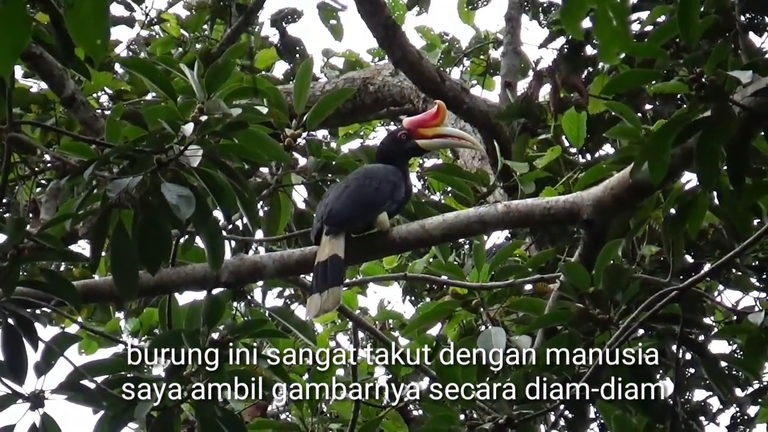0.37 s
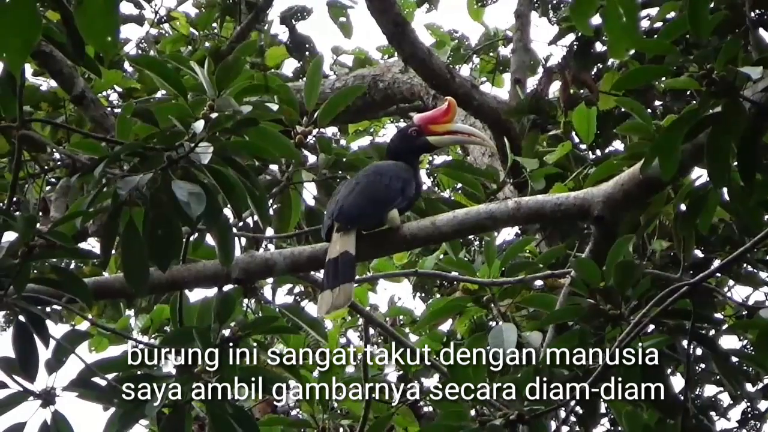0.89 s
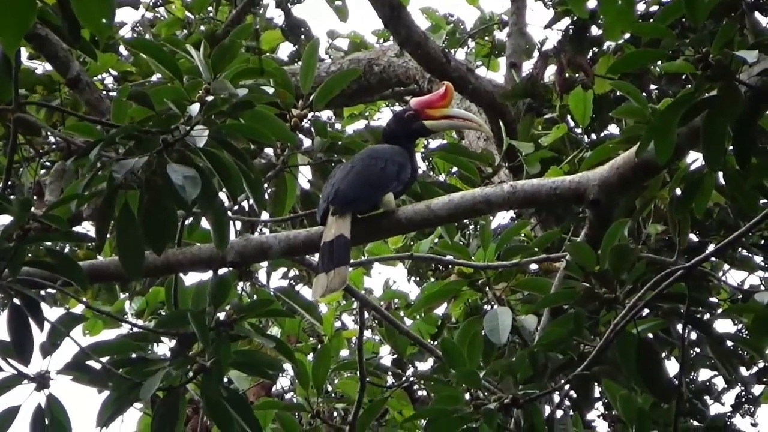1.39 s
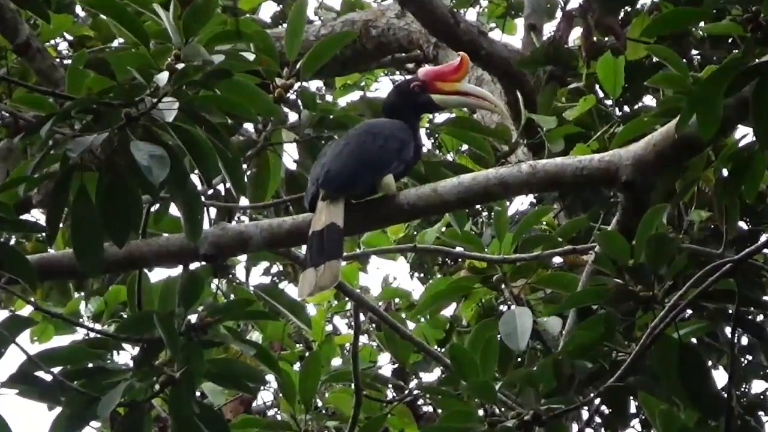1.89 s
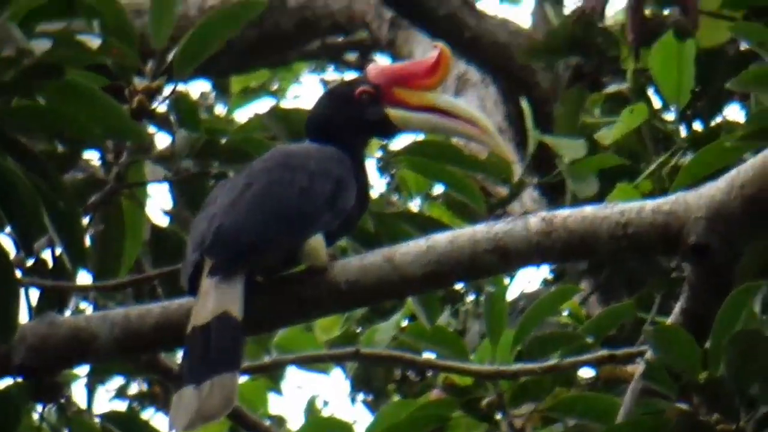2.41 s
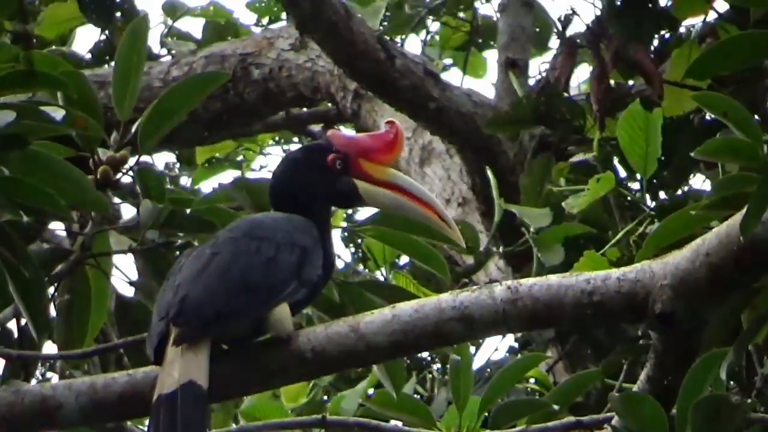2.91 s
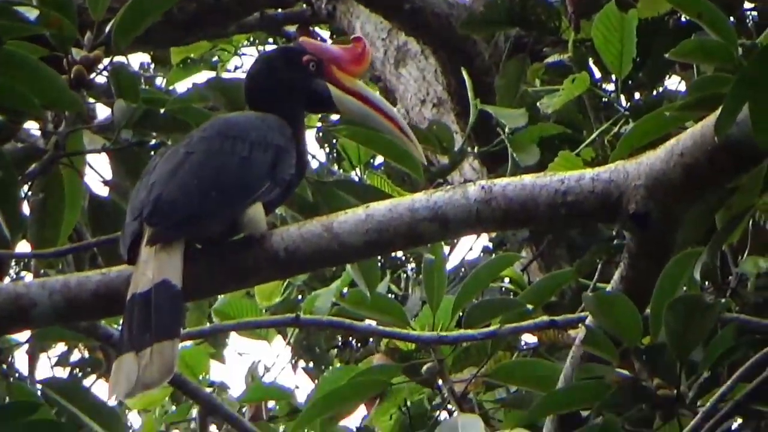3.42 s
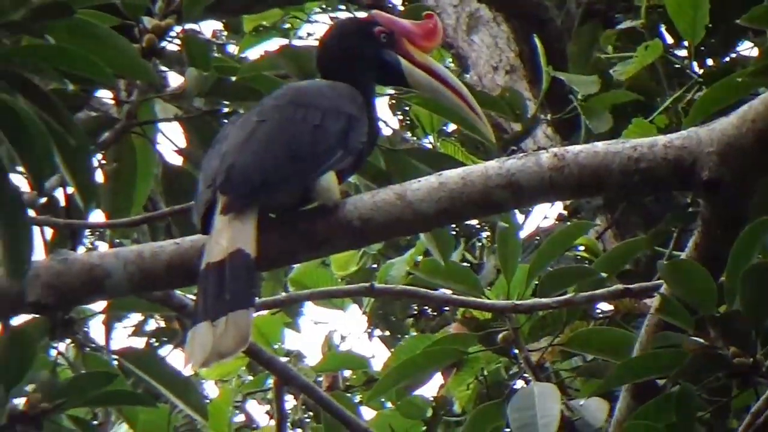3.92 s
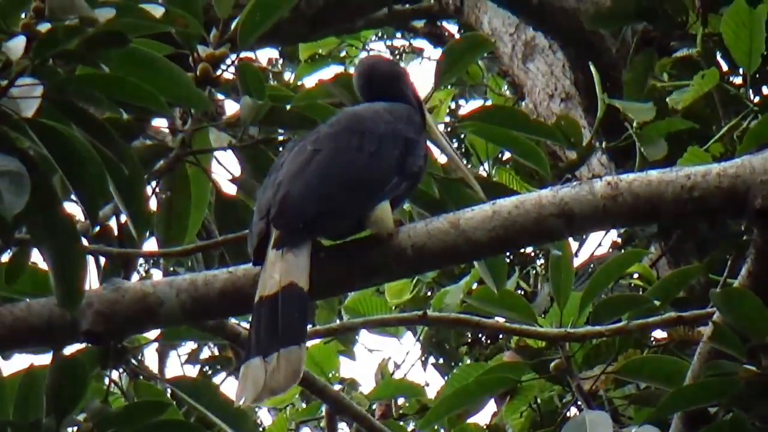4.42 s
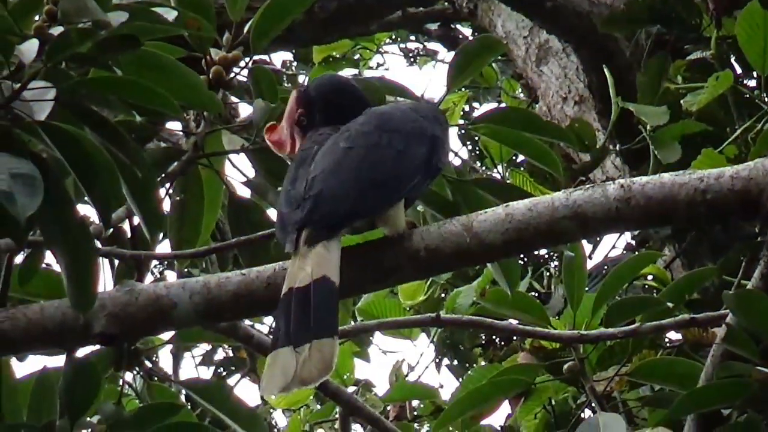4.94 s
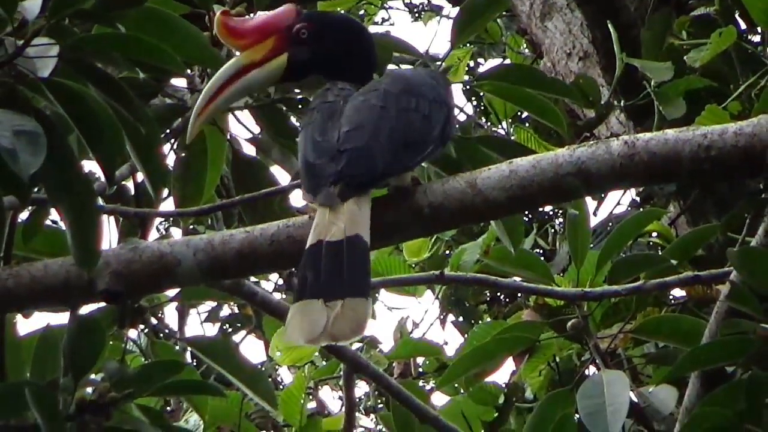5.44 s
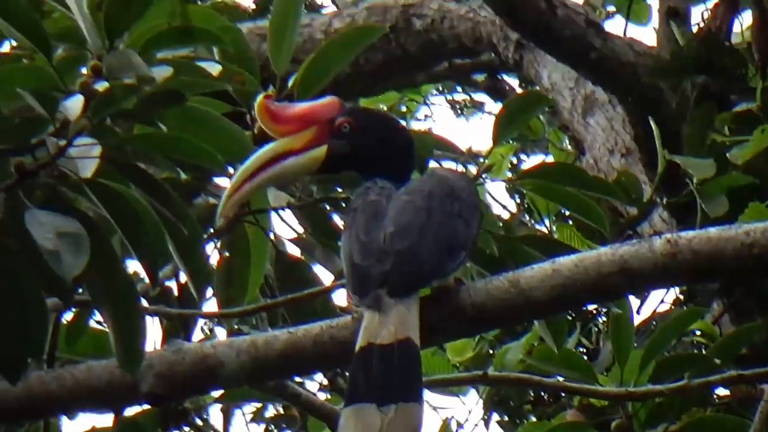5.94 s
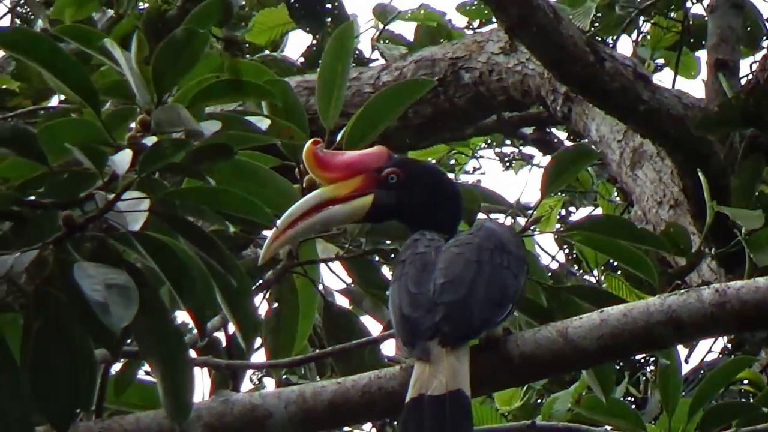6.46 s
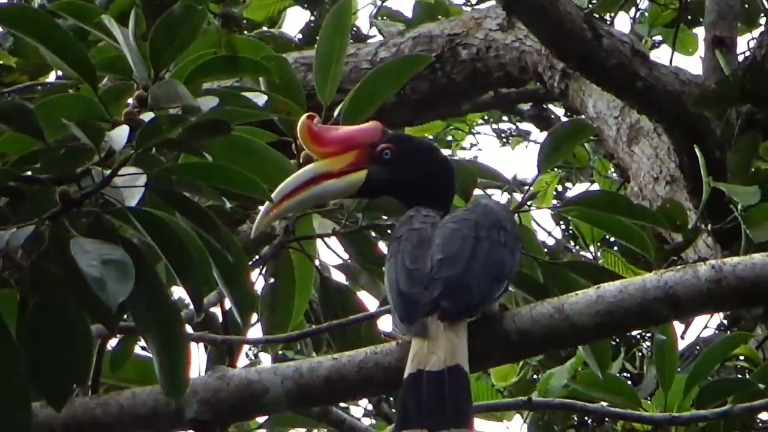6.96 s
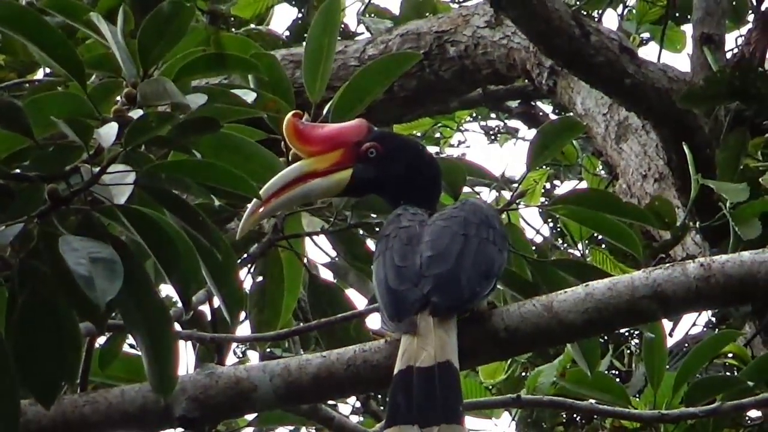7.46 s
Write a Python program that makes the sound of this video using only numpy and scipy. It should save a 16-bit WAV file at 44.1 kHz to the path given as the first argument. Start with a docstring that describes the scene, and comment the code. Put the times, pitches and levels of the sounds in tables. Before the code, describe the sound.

A shrill, steady cricket drone fills a tropical forest while buzzing cicadas swell and cut off, with faint croaks, bird notes and twig knocks.

```python
"""Insect chorus in a tropical forest: crickets, warbling sines with a weak octave, blur into one shrill drone.
Cicadas are buzzes of falling rings that swell and cut off, one far voice sounding throughout; scrapers are
resonant hiss. A far croaking of filtered noise breathes in and out over low hum lines and coloured hush.
Faint bird and frog notes are near sines, twig knocks are struck modes; at the end a squeak of high harmonics
rises in a rustle. Most voices ring among the trunks in decaying noise echoes."""
import sys
import numpy as np
from scipy import signal
from scipy.fft import rfft, irfft
from scipy.io import wavfile
from scipy.ndimage import map_coordinates

SR = 44100
rng = np.random.default_rng(int(sys.argv[2]) if len(sys.argv) > 2 else 0)


def wav_out(sig):
    """Save sig, one row per channel (or a flat mono array), as 16-bit PCM at SR to the path in sys.argv[1]."""
    wavfile.write(sys.argv[1], SR, np.round(np.clip(np.atleast_2d(sig).T, -1, 1) * 32767).astype(np.int16))


def undo_db(level):
    """Turn decibels back into plain size, where 20 dB means ten times bigger."""
    steps = np.asarray(level, float) / 20
    return 10 ** steps


N = 334719


def rms_one(x):
    """Scales to an rms of 1."""
    return x / np.sqrt(np.mean(x ** 2) + 1e-20)


def in_time(rows):
    """Columns interpolated over time, then a gate that is open while the table lasts."""
    time_s, *columns = np.transpose(rows)
    t = np.arange(N) / SR
    return [np.interp(t, time_s, column) for column in columns] + [(t >= time_s[0]) & (t <= time_s[-1])]


def drift(rate_hz):
    """Smooth random wander of spread about 1, two random points per cycle of the rate."""
    count = int(N / SR * rate_hz * 2) + 3
    return map_coordinates(rng.standard_normal(count), [np.linspace(0, count - 1, N)], order=3)


def turning(hz):
    """Phase in radians of a varying frequency."""
    return 2 * np.pi * np.cumsum(hz) / SR


def panned(x, pan_db):
    """Level difference between the sides; positive is left."""
    return x * undo_db(np.array([[.5], [-.5]]) * pan_db)


def band(x, hz, width_hz):
    """Band-pass with a flat top and steep flanks."""
    edges_hz = [hz - width_hz / 2, hz + width_hz / 2]
    return signal.sosfilt(signal.butter(3, edges_hz, "band", fs=SR, output="sos"), x)


def resonance(x, hz, width_hz):
    """Two-pole peak of gain 1, passed twice for steep flanks."""
    r = np.exp(-np.pi * width_hz / SR)
    for _ in range(2):
        x = signal.lfilter([(1 - r * r) / 2, 0, (r * r - 1) / 2],
                           [1, -2 * r * np.cos(2 * np.pi * hz / SR), r * r], x)
    return x


def spread(mid, side, alike):
    """Left and right of a given likeness from two independent noises."""
    return (np.sqrt(1 + alike) * mid + np.sqrt(1 - alike) * side * [[1], [-1]]) / np.sqrt(2)


def pair_of_noise(alike, size=N):
    """Stereo white noise of a given likeness (0-1)."""
    mid, side = rng.standard_normal((2, size))
    return spread(mid, side, alike)


def forest(x, wet_db):
    """Direct sound plus dense scatter off trunks and leaves; moving air keeps changing the paths."""
    t60_s, air_shift_s, echo_likeness = .55, .25, 0.44
    size, step = int(t60_s * SR), int(air_shift_s * SR)
    padded = np.pad(x, [(0, 0), (step, 2 * step)])
    echoes = np.zeros((2, padded.shape[1] + size))
    fade = np.sin(np.pi * np.arange(2 * step) / (2 * step))   # overlapping halves add up in power
    for start in range(0, N + step, step):
        tail = pair_of_noise(echo_likeness, size) * undo_db(-60 * np.arange(size) / size)
        tail = tail / np.sqrt(np.sum(tail ** 2) / 2)
        part = signal.fftconvolve(padded[:, start:start + 2 * step] * fade, tail, axes=1)
        echoes[:, start:start + part.shape[1]] += part
    return (x + undo_db(wet_db) * echoes[:, step:step + N]) / np.sqrt(1 + undo_db(2 * wet_db))   # power is kept


# crickets: (warbles_per_s, swing_hz, pan_db, octave_db), (start_s, first_hz, settled_s, last_hz, level_db)
CRICKET_VOICES = [((20.5, 32, 0.1, -46), (0, 5835, 7.6, 5828, -43.5)), ((10.3, 95, 0.1, -40),
                  (0, 5755, 7.6, 5770, -43.2)), ((19.3, 48, 0.5, -29), (0, 5690, 7.6, 5735, -43.7)),
                  ((11.2, 40, -0.5, -45), (0, 5975, 2, 6020, -54)), ((18.7, 40, 0.5, -45),
                  (0, 6000, 3, 5950, -57)), ((19.9, 38, 0.1, -45), (1.6, 5570, 3.8, 5660, -49.5)),
                  ((9.8, 45, 0.5, -45), (3.9, 5410, 5.3, 5570, -50.5)), ((8.5, 25, 1.0, -45),
                  (0, 5465, 4.5, 5460, -64)), ((9.8, 42, 0.5, -45), (2.3, 5420, 7.6, 5440, -57))]


def crickets():
    """Each wing note warbles up and down, louder on one stroke; a weak octave rides along."""
    chorus_swell_db, entry_s = 1, .2   # growth from start to end; fade-in of a newcomer
    t = np.arange(N) / SR
    out = np.zeros((2, N))
    for (warbles_per_s, swing_hz, pan_db, octave_db), song in CRICKET_VOICES:
        start_s, first_hz, settled_s, last_hz, song_db = song
        hz, gate = in_time([(start_s - entry_s, first_hz), (settled_s, last_hz), (settled_s + N / SR, last_hz)])
        entry_db = 20 * np.clip((t - start_s) / entry_s, -1, 0)
        level_db = song_db + chorus_swell_db * (t * SR / N - .5) + entry_db
        stroke = turning(warbles_per_s * (1 + 0.03055 * drift(1.5))) + 2 * np.pi * rng.random()
        phase = turning(hz + swing_hz * np.sin(stroke) + 4.0 * drift(8.0) + 5.0 * drift(40.0))
        note = np.sqrt(2) * (np.sin(phase) + undo_db(octave_db) * np.sin(2 * phase))
        stroke_db = 3.8 * np.cos(stroke) + 0.3 * drift(6.5)
        out += panned(note * gate * undo_db(level_db + stroke_db), pan_db)
    return forest(out, wet_db=1.0)


WARM_UP_S = 0.406


def cicada_call(row, warms_up):
    """Sudden entry, slow swell, slight lift at the end, sharp cut; the drum pitch glides through the call."""
    start_s, end_s, first_hz, last_hz, call_db = row
    onset_s, swell_s, swell_db = 0.046, 0.32, 3.5
    lift_s, lift_db, cut_db_per_s = 0.48, 0.5, 1200
    warm_up_db, warm_up_db_per_s = -7.5, 26   # faint hum ahead of full voice, growing
    t = np.arange(N) / SR
    full_db = np.interp(t, [start_s - onset_s, start_s, start_s + swell_s], [-40, -swell_db, 0])
    full_db = full_db + lift_db * np.clip(1 - (end_s - t) / lift_s, 0, 1)
    warm_db = np.where(warms_up & (t < start_s), warm_up_db + warm_up_db_per_s * (t - start_s), -99)
    level_db = call_db + np.maximum(full_db, warm_db) - cut_db_per_s * np.clip(t - end_s, 0, .05)
    gate = (t > start_s - WARM_UP_S) & (t < end_s + .03)
    return np.interp(t, [start_s, end_s], [first_hz, last_hz]), level_db, gate


def cicada(voice, songs, wet_db):
    """Each buckling of the ribbed drum is a short ring that falls in pitch; a second drum fills in between."""
    buckles_per_s, fall_hz, waver_hz, second_drum, octave_db, pan_db, slowing_per_s2 = voice
    out = 0
    for hz, level_db, gate in songs:
        tired_s = np.maximum(np.cumsum(gate) / SR - WARM_UP_S, 0)   # the muscle tires through a call
        rate_hz = buckles_per_s - slowing_per_s2 * tired_s
        cycle = turning(rate_hz * (1 + .002 * drift(3.0) + .015 * drift(60.0)))
        waver = waver_hz * (.45 * drift(12.0) + drift(90.0))
        phase = turning(hz - fall_hz * np.sin(cycle) + waver)
        pulses = 1 + .45 * np.cos(cycle) + second_drum * np.cos(2 * cycle)
        pulses = pulses * (1 + .15 * drift(150.0))
        buzz = rms_one(pulses * np.sin(phase)) + undo_db(octave_db) * rms_one(pulses * np.sin(2.02 * phase))
        out = out + buzz * undo_db(level_db) * gate
    return forest(panned(out, pan_db), wet_db)


# voice: buckles_per_s, fall_hz, waver_hz, second_drum (0-1), octave_db, pan_db, slowing_per_s2
FAR_VOICE = (105.0, 200, 60, .4, -45, -1.5, 0)
# unbroken song: time_s, drum_hz, level_db
FAR_UNBROKEN = [(0, 4570, -55), (.9, 4520, -58), (2.1, 4610, -52), (3, 4570, -56.5), (3.5, 4434, -55.5),
                (3.7, 4477, -49), (4.3, 4560, -48.5), (4.6, 4654, -54), (5, 4630, -57.5), (6.4, 4620, -48),
                (6.55, 4620, -48), (6.62, 4550, -52), (7.6, 4595, -53.5)]
# one call of another far cicada: full_voice_s, cut_off_s, first_hz, last_hz, level_db
FAR_HIGH_CALLS = [(5.72, 6.55, 4980, 5030, -54)]


def far_cicada():
    """Unbroken far drum buzz, joined by one higher call."""
    calls = [cicada_call(row, False) for row in FAR_HIGH_CALLS]
    return cicada(FAR_VOICE, [in_time(FAR_UNBROKEN)] + calls, wet_db=1.5)


# scraper crowds: centre_hz, width_hz, level_db, throbs_per_s, throb_db, likeness (0-1)
SCRAPER_CROWDS = [(7062, 1080, -1.87, 3.0, 0, 0.78), (8300, 700, -13, 50.0, 1.0, .9),
                  (8640, 110, -16, 50.0, 2.5, .9), (13650, 650, -27, 1.9, 0.5, 0.84)]


def scrapers():
    """Too many to count: their clicks merge into throbbing hiss in each wing resonance."""
    out, t = 0, np.arange(N) / SR
    for hz, width_hz, level_db, throbs_per_s, throb_db, alike in SCRAPER_CROWDS:
        throb = throb_db * np.sin(2 * np.pi * throbs_per_s * t + .5 * drift(0.29))
        hiss = resonance(band(pair_of_noise(alike), hz, 4.3 * width_hz), hz, width_hz)
        out = out + undo_db(level_db + throb + 0.56 * drift(8.2)) * rms_one(hiss)
    return out * undo_db(-43)   # level of all crowds, dB


# throat resonances: centre_hz, width_hz, gain_db
THROAT = [(1585, 300, 4.6), (2010, 410, 0.5), (2400, 315, 3)]
# croaks: peak_s, peak_db, piped_note_db
CROAK_TIMES = [(0.59, -59.5, -74), (1.3, -58.5, -75), (1.99, -56.5, -72), (2.68, -58, -61),
               (3.38, -57.5, -68), (4.079, -57, -65), (4.721, -57, -62.5), (5.35, -56.5, -67),
               (6.001, -57.5, -65), (6.659, -58, -62), (7.339, -57, -64)]


def croaking():
    """A far crowd in step: breathy sound in the throat resonances, swelling and fading together."""
    rise_db_per_s, fall_db_per_s, rest_db = 26, 28, -65
    air, t = pair_of_noise(.68), np.arange(N) / SR
    voice = 0
    for k, (hz, width_hz, gain_db) in enumerate(THROAT):
        voice = voice + undo_db(gain_db) * resonance(air, hz, width_hz) * (-1) ** k
    swells_db = [peak_db - np.maximum(rise_db_per_s * (peak_s - t), fall_db_per_s * (t - peak_s))
                 for peak_s, peak_db, _ in CROAK_TIMES]
    return undo_db(np.maximum(np.max(swells_db, axis=0), rest_db)) * rms_one(voice)


# lower hum line: time_s, level_db
HUM_LEVEL = [(0.0, -72), (1.37, -77.5), (1.77, -63), (2.3, -79), (2.56, -66.5), (2.68, -65.5), (3.04, -77),
             (3.4, -75), (3.74, -67.5), (4.14, -69.5), (4.37, -70), (4.48, -93), (5.9, -93), (6.17, -69),
             (6.41, -90), (6.68, -68.5), (6.85, -85), (7.59, -101)]
# hum lines: lower_hz, upper_hz
HUM_LINES = (164.6, 190)


def hum():
    """Two low wavering sines, alike on both sides; the upper follows up to a ceiling and flickers."""
    upper_top_db, upper_flicker_db = -77, 2.5
    low_db = in_time(HUM_LEVEL)[0]
    upper_db = np.minimum(low_db, upper_top_db) + upper_flicker_db * drift(3.2)
    out = 0
    for hz, level_db in zip(HUM_LINES, (low_db, upper_db)):
        line = np.sqrt(2) * np.sin(turning(hz + 2.2 * drift(3.2)))
        out = out + undo_db(level_db + 1.1 * drift(5.5)) * line
    return out


# hush spectrum: freq_hz, density_db (per Hz, relative)
HUSH_COLOUR = [(25, -22), (60, -14), (110, -8), (160, -1), (400, -1), (700, 1.8), (1050, 1), (1300, -3),
               (2600, -4), (3400, -3), (3900, -6), (5000, -13), (5250, -21), (6150, -9), (6500, -4),
               (9500, -8), (11000, -13), (15100, -14), (15200, -19)]
# hush stereo: freq_hz, likeness (0-1)
HUSH_LIKENESS = [(25, 0.68), (120, 1), (250, 0.82), (500, 0.45), (1200, 0.11), (2500, 0.29), (5000, 1),
                 (9000, 0.99), (9700, 1.0)]


def hush():
    """Leaves, air and far life: coloured noise, nearly steady, with a likeness that depends on pitch."""
    log_hz = np.log(np.arange(1, N // 2 + 2) * SR / N)
    colour_hz, colour_db = np.transpose(HUSH_COLOUR)
    alike_hz, alike = np.transpose(HUSH_LIKENESS)
    colour = undo_db(np.interp(log_hz, np.log(colour_hz), colour_db))
    alike = np.interp(log_hz, np.log(alike_hz), alike)
    mid, side = rfft(rng.standard_normal((2, N)))
    noise = irfft(colour * spread(mid, side, alike), N)
    return undo_db(-54 + 0.88 * drift(3.0)) * rms_one(noise)


# bird and frog callers: (first_hz, last_hz, pan_db, hoarseness (0-1)), notes [(start_s, end_s, level_db)]
CALLERS = [((1890, 1940, 4, .3), [(0.639, 0.845, -60), (1.561, 1.59, -56.5), (1.599, 1.694, -57),
           (1.70, 1.88, -66)]), ((766, 765, 1.5, .05), [(1.418, 1.447, -51), (1.454, 1.482, -51),
           (1.543, 1.556, -61)]), ((895, 922, 2.5, .15), [(1.555, 1.59, -57), (1.672, 1.705, -60)]),
           ((998, 991, 13, .7), [(2.43, 2.55, -67), (3.9, 4.3, -67), (5.8, 6.15, -66)]), ((790, 780, 3, .7),
           [(5.85, 6.3, -67)]), ((3140, 3148, 0.1, .3), [(.85, 1.25, -69), (2.36, 2.7, -70),
           (3.6, 4.3, -68.5), (6.85, 7.25, -65.5)]), ((3130, 3120, -5, .6), [(7.362, 7.441, -48),
           (7.43, 7.6, -58)]), ((3270, 3290, -2.5, .5), [(7.41, 7.44, -57), (7.5, 7.577, -65)])]


def notes():
    """Near sines under a soft arch, wavering and fluttering as far as the caller is hoarse."""
    pipe_hz, pipe_lead_s, pipe_s = 1638, .03, 0.11   # piped note on top of each croak
    out = np.zeros((2, N))
    flutter_db, waver_hz = 6.0 * drift(70.0) - 2.0, 70.0 * drift(60.0)
    piped = [(peak_s - pipe_lead_s, peak_s - pipe_lead_s + pipe_s, level_db)
             for peak_s, _, level_db in CROAK_TIMES]
    for (first_hz, last_hz, pan_db, hoarse), rows in CALLERS + [((pipe_hz, pipe_hz, 0, .4), piped)]:
        for start_s, end_s, level_db in rows:
            span = slice(int(start_s * SR), min(int(end_s * SR), N))
            u = np.linspace(0, 1, span.stop - span.start)
            tone = np.sqrt(2) * np.sin(turning(first_hz + (last_hz - first_hz) * u + hoarse * waver_hz[span]))
            arch = np.sin(np.pi * u) ** .7
            out[:, span] += panned(tone * arch * undo_db(level_db + hoarse * flutter_db[span]), pan_db)
    return forest(out, wet_db=-5.0)


# voice: buckles_per_s, fall_hz, waver_hz, second_drum (0-1), octave_db, pan_db, slowing_per_s2
NEAR_VOICE = (109.0, 150, 24, .4, -18, -2.4, 6.0)
# calls: full_voice_s, cut_off_s, first_hz, last_hz, level_db
NEAR_CALLS = [(1.332, 2.031, 4586, 4573, -39.5), (5.825, 6.399, 4566, 4590, -39.5)]


def near_cicada():
    """Close drum buzz that hums faintly before each call."""
    return cicada(NEAR_VOICE, [cicada_call(row, True) for row in NEAR_CALLS], wet_db=-8.5)


# knocks: time_s, strength_db, low_mode_share (0-1), pan_db
TWIG_KNOCKS = [(1.098, -36, 0.04, -3), (1.394, -41.5, 0.04, 2), (1.514, -43, 0.04, 3),
               (1.661, -42, 0.06, 0.5), (2.335, -36, 0.66, 5.5), (2.439, -49, 0.4, 2.0),
               (2.96, -52, 0.3, 0.1), (7.455, -43, 0.37, -2)]
# wood modes: mode_hz, gain_db, t60_s
WOOD_MODES = [(774, 2, 0.056), (935, 0, 0.04), (1090, -7.5, 0.055), (1245, -4, 0.067), (1796, 2, 0.017),
              (2170, -3.5, 0.019), (2770, -14, 0.012), (3170, -4.5, 0.014), (4010, -6.5, 0.011)]


def knocks():
    """A tick and the modes of the wood; a thicker twig favours the low modes, a soft knock is dull."""
    contact_s = .006
    dulling = 0.44   # dB of treble lost per dB softer than the hardest knock
    time_s, strength_db, low_share, pan_db = np.transpose(TWIG_KNOCKS)
    at = (time_s * SR).astype(int)
    clicks, thick, hard = np.zeros((2, N)) + 1e-18, np.zeros(N), np.zeros(N)
    clicks[:, at] = panned(undo_db(strength_db), pan_db)
    thick[at] = low_share
    hard[at] = undo_db(dulling * (strength_db - strength_db.max()))
    out = undo_db(14.0) * band(clicks * hard, 4800, 7000)
    for hz, gain_db, t60_s in WOOD_MODES:
        r, w = undo_db(-60 / (t60_s * SR)), 2 * np.pi * hz / SR
        if hz < 1000:
            share = thick
        elif hz < 1500:
            share = 1 - thick
        else:
            share = 0.74 * hard
        out += undo_db(gain_db) * signal.lfilter([0, np.sin(w)], [1, -2 * r * np.cos(w), r * r], clicks * share)
    u = np.arange(int(contact_s * SR)) / (contact_s * SR)
    splinters = rng.standard_normal(len(u)) * np.sin(np.pi * u) * 0.17   # the contact crunches for a moment
    crunch = signal.fftconvolve(undo_db(15.5) * band(clicks * hard, 3100, 4300), splinters[None], axes=1)
    out = out + crunch[:, :N]
    out = signal.sosfilt(signal.butter(3, 680, "high", fs=SR, output="sos"), out)   # thin wood has no thump
    return forest(out, wet_db=-11.5)


# voice: buckles_per_s, fall_hz, waver_hz, second_drum (0-1), octave_db, pan_db, slowing_per_s2
LOW_VOICE = (118.3, 180, 22, .08, -45, -5.0, 12.5)
# calls: full_voice_s, cut_off_s, first_hz, last_hz, level_db
LOW_CALLS = [(5.04, 6.08, 4255, 4320, -45.5)]


def low_cicada():
    """Lower-pitched drum buzz, no hum before the call."""
    return cicada(LOW_VOICE, [cicada_call(row, False) for row in LOW_CALLS], wet_db=-9)


# squeak and rustle: time_s, slips_hz, bright_spot_hz, squeak_db, rustle_db
SQUEAK_COURSE = [(7.28, 770, 8950, -75, -57), (7.37, 773, 9200, -62, -52), (7.44, 782, 9500, -66, -50),
                 (7.465, 840, 8300, -49, -43.5), (7.52, 836, 8400, -50, -48), (7.54, 826, 9200, -47, -47),
                 (7.6, 830, 9100, -45, -42)]


def squeak():
    """High harmonics of a stick-slip rub around a moving bright spot, in a crackling rustle that follows it."""
    slips_hz, bright_hz, squeak_db, rustle_db, gate = in_time(SQUEAK_COURSE)
    phase = turning(slips_hz + 3.1 * drift(57.0))
    rub, rustle = 0, 0
    for k in range(9, 17):
        nearness = np.exp(-((k * slips_hz - bright_hz) / 800) ** 2)
        rub = rub + nearness * undo_db(2.0 * drift(40.0)) * np.sin(k * phase)
    air = pair_of_noise(0.57)
    for centre_hz in range(3000, 15001, 1000):
        weight = .6 * (centre_hz < 9000) + .25 + np.exp(-((centre_hz - bright_hz) / 1600) ** 2)
        rustle = rustle + weight * undo_db(1.5 * drift(80.0)) * band(air, centre_hz, 1000)
    return gate * (undo_db(squeak_db) * rub + undo_db(rustle_db) * rms_one(rustle))


def scene():
    """Sum of all sources."""
    insects = crickets() + far_cicada() + near_cicada() + low_cicada() + scrapers()
    return insects + croaking() + hum() + hush() + notes() + knocks() + squeak()


def narrowed(x):
    """The top of the treble falls to the centre: side signal low-passed at 9600 Hz."""
    side = signal.sosfiltfilt(signal.butter(6, 9600, fs=SR, output="sos"), (x[0] - x[1]) / 2)
    return x.mean(axis=0) + side * [[1], [-1]]


def band_limit(x):
    """A steep low-pass at the top of the band."""
    return signal.sosfilt(signal.butter(12, 15680, fs=SR, output="sos"), x)


def record(dry):
    """Stereo file as stored: sides narrowed in the high treble."""
    return band_limit(narrowed(dry))


dry = scene()
out = record(dry)
wav_out(out)
```